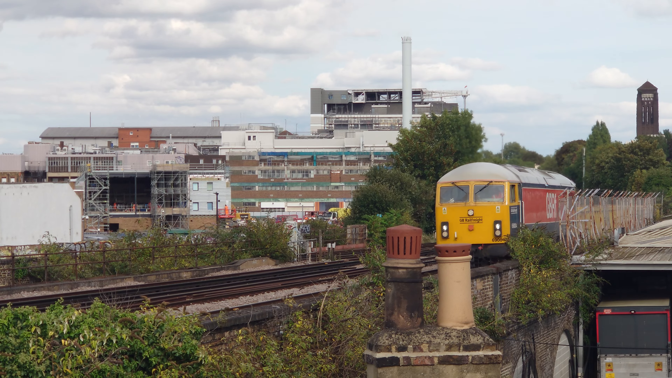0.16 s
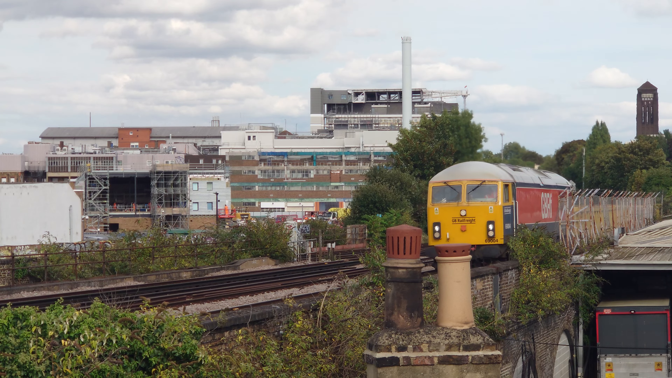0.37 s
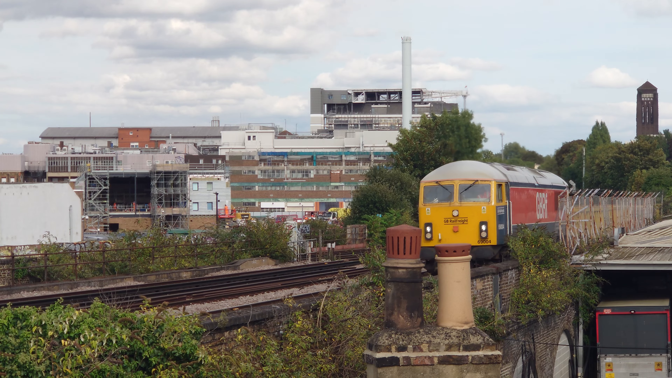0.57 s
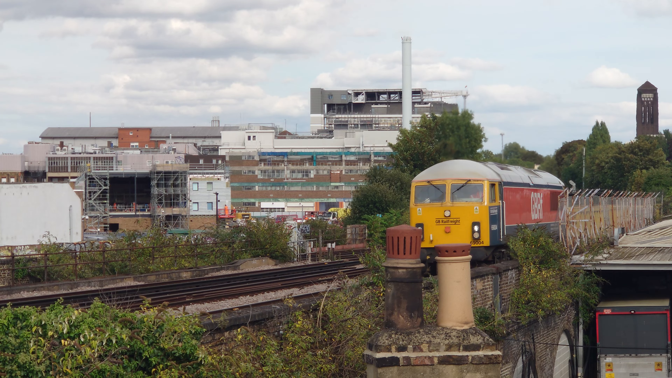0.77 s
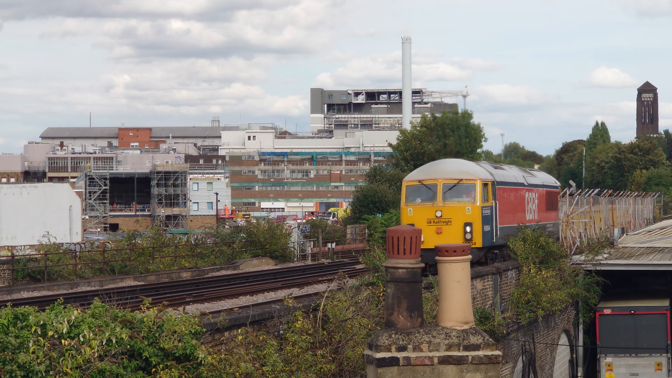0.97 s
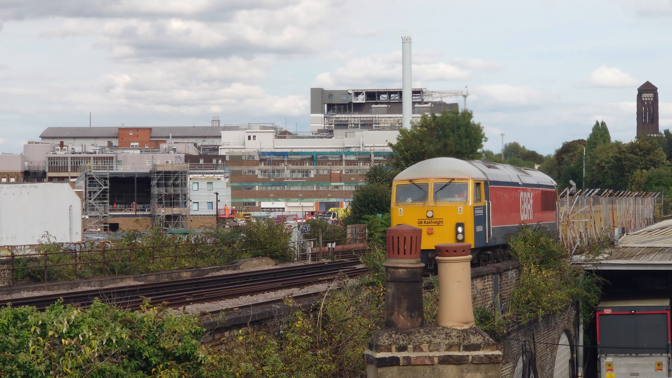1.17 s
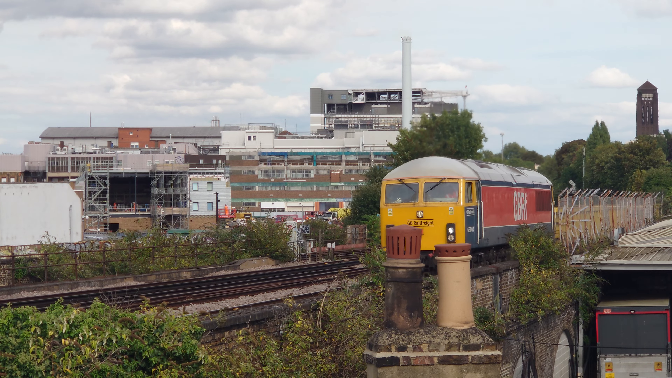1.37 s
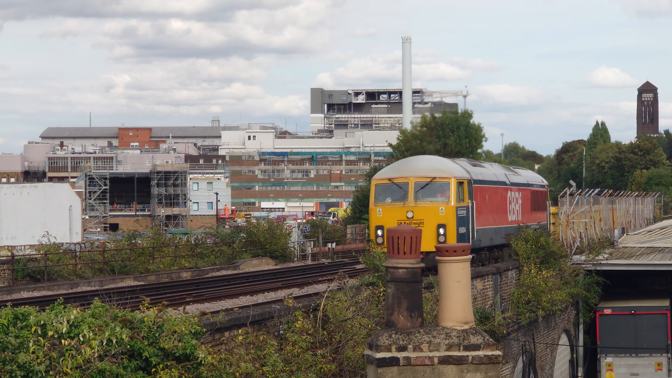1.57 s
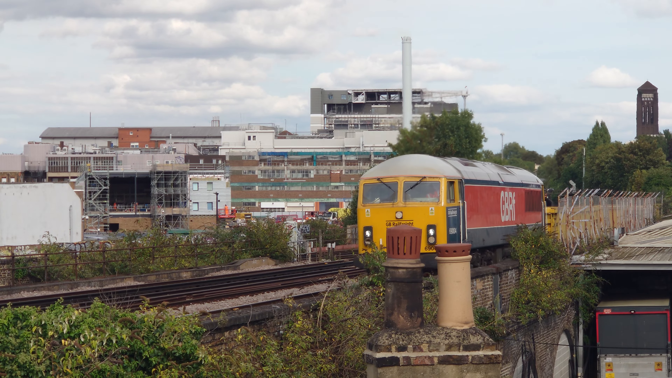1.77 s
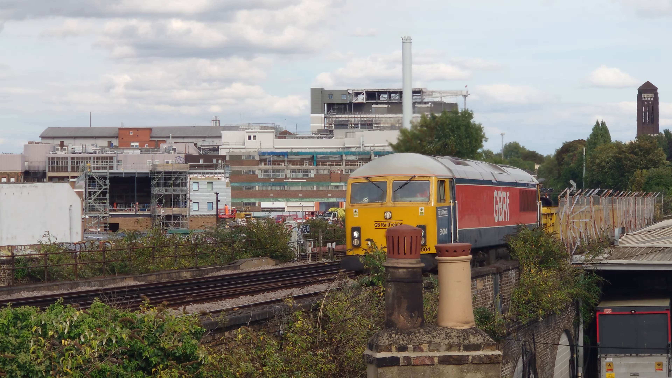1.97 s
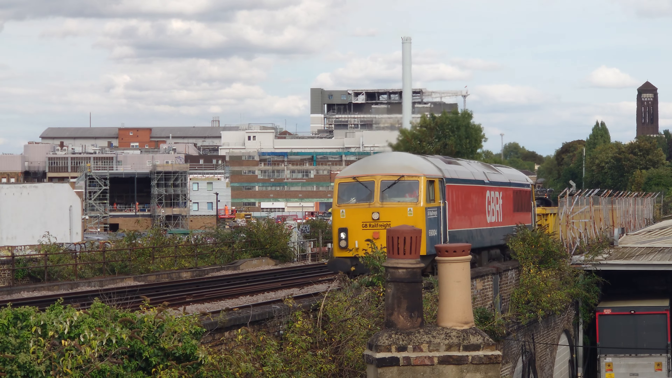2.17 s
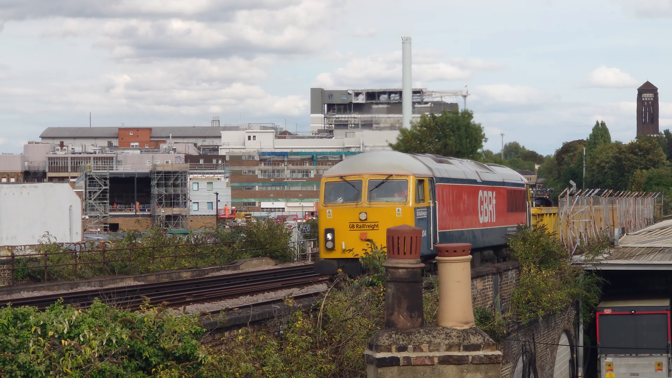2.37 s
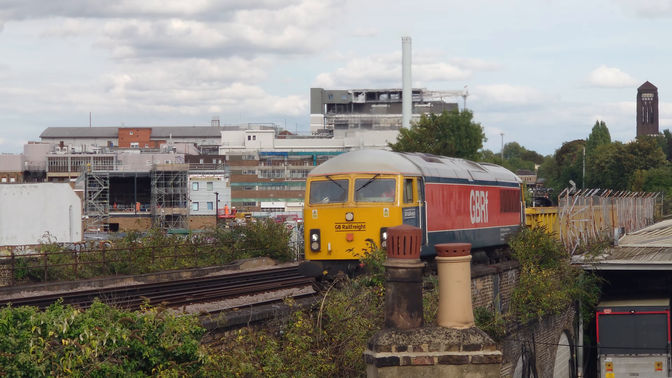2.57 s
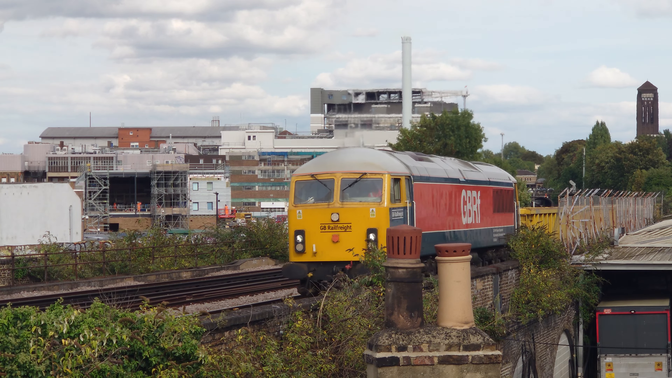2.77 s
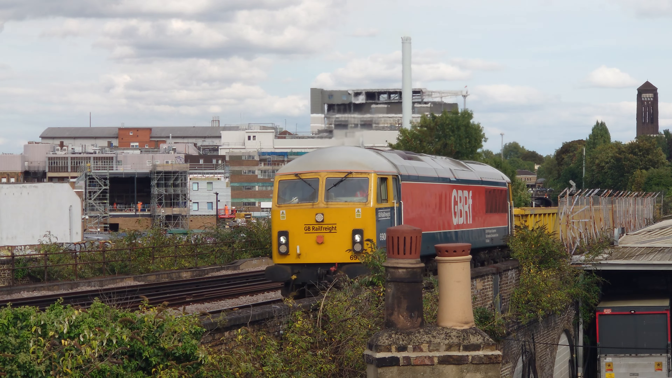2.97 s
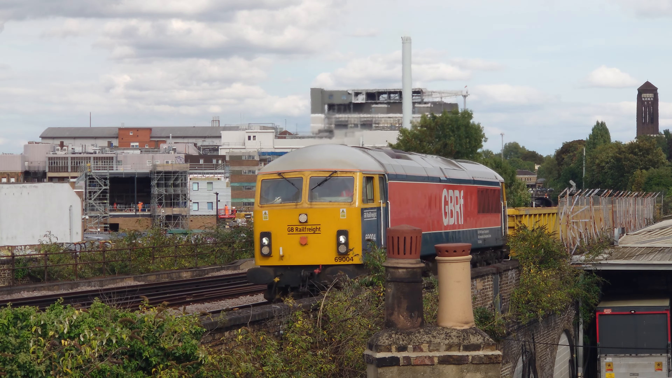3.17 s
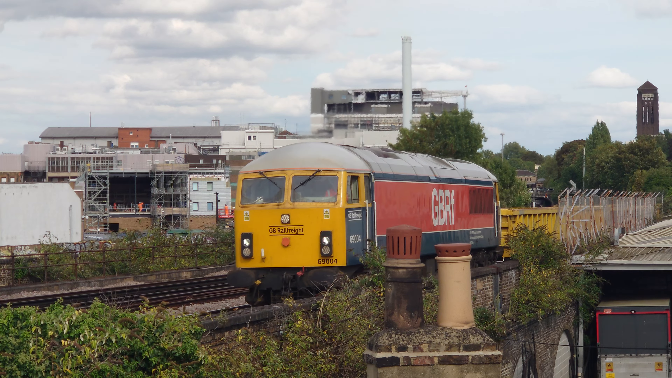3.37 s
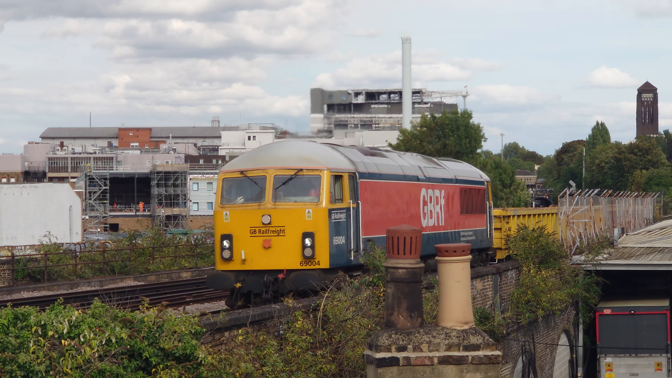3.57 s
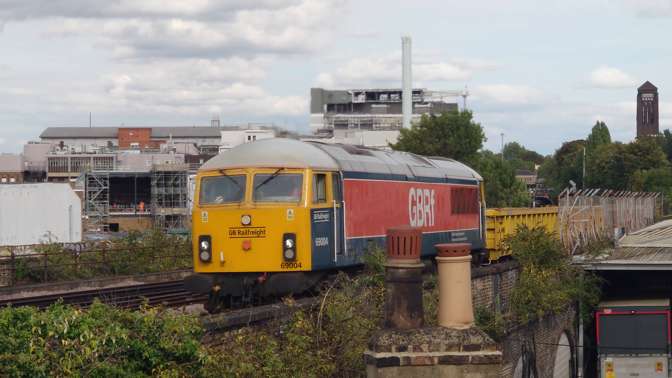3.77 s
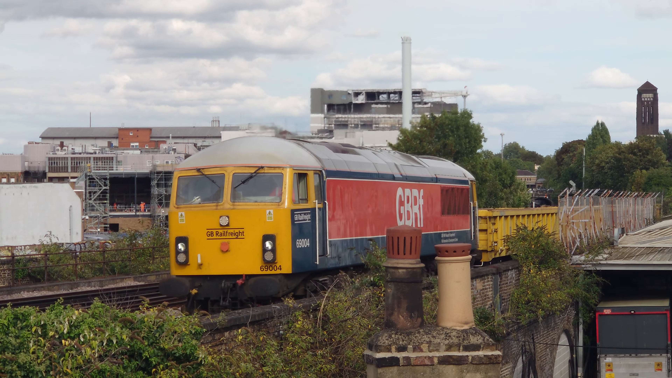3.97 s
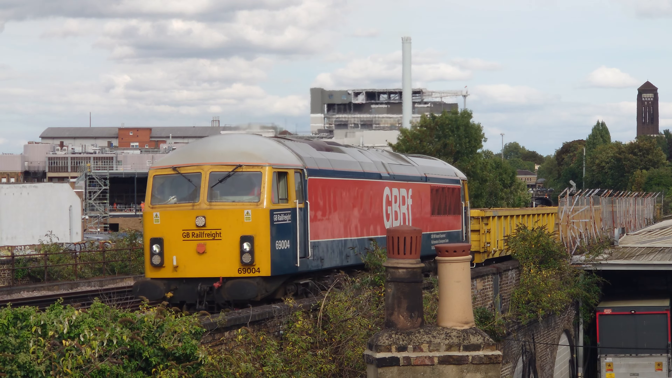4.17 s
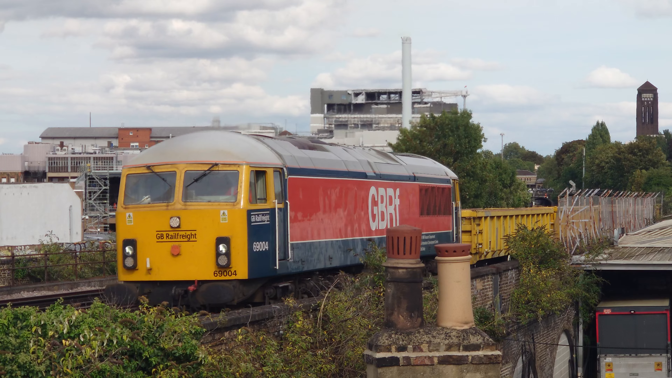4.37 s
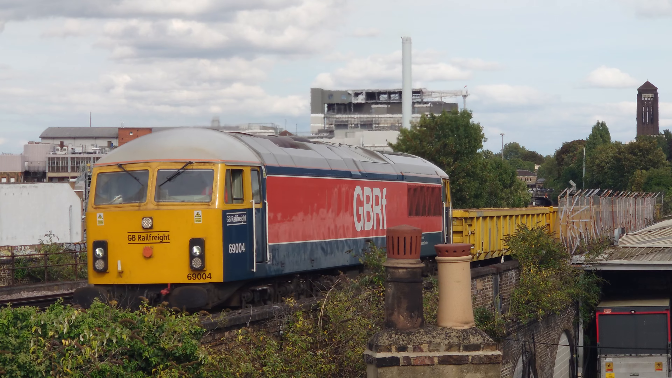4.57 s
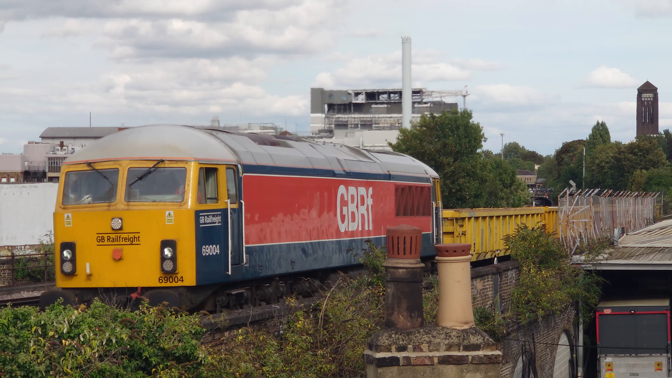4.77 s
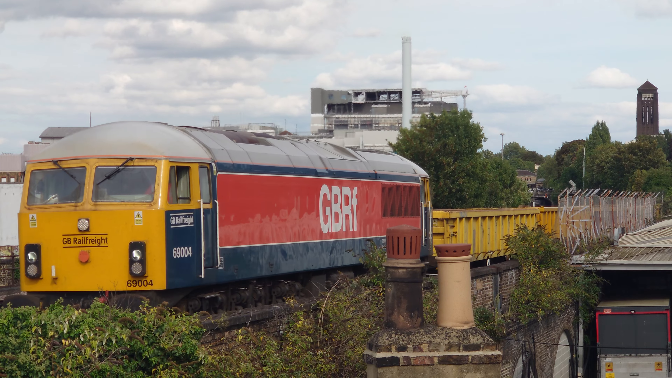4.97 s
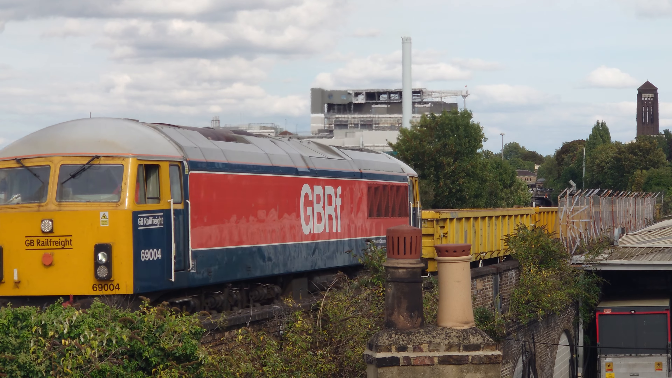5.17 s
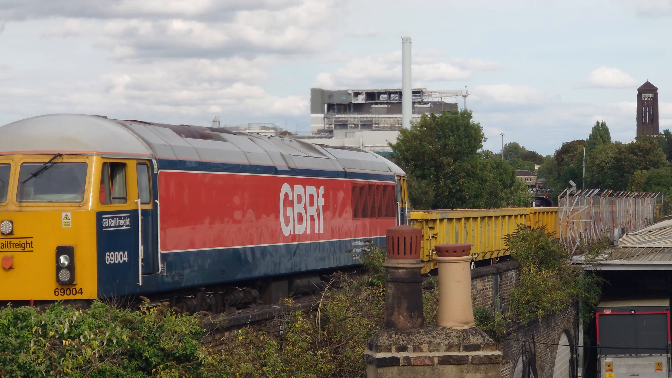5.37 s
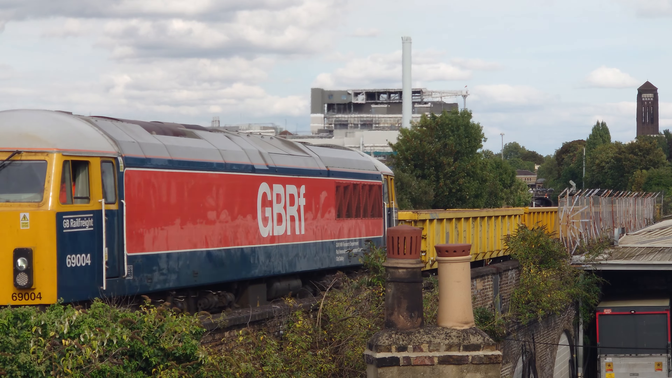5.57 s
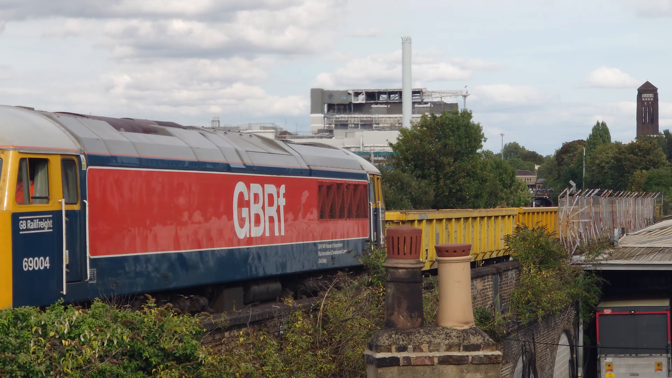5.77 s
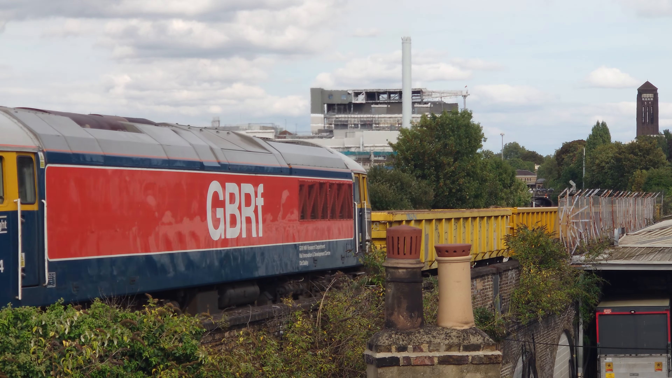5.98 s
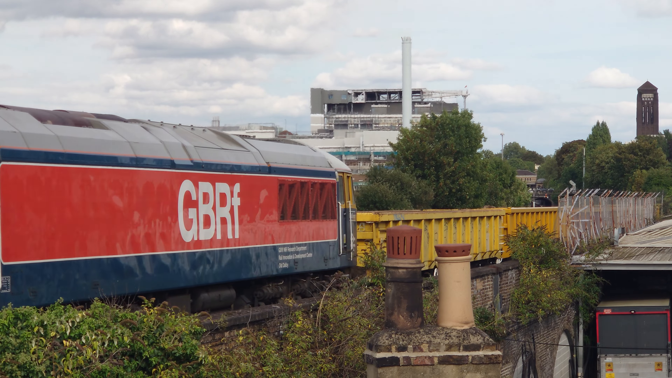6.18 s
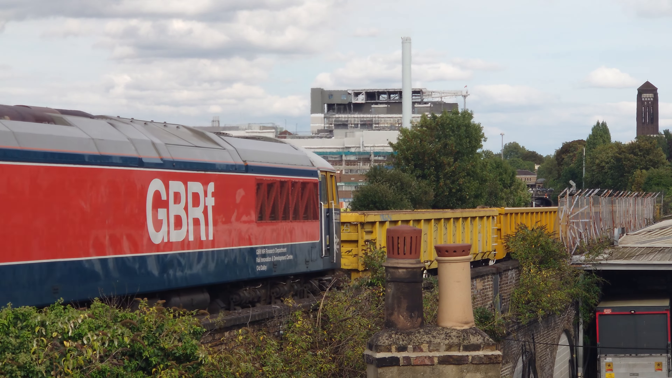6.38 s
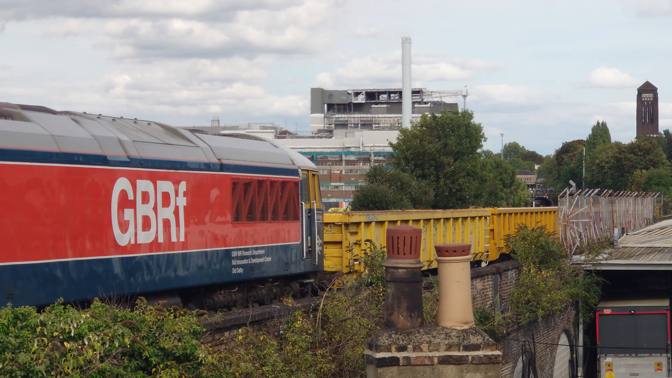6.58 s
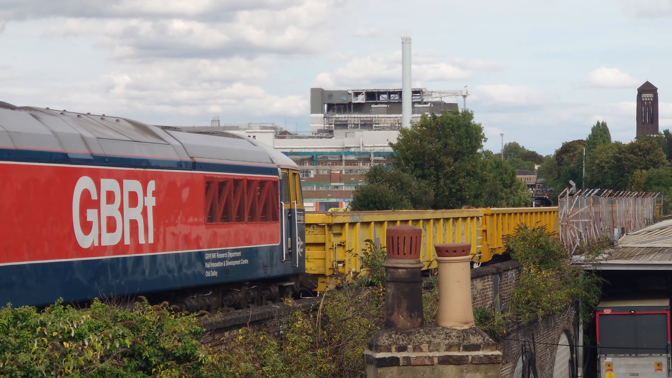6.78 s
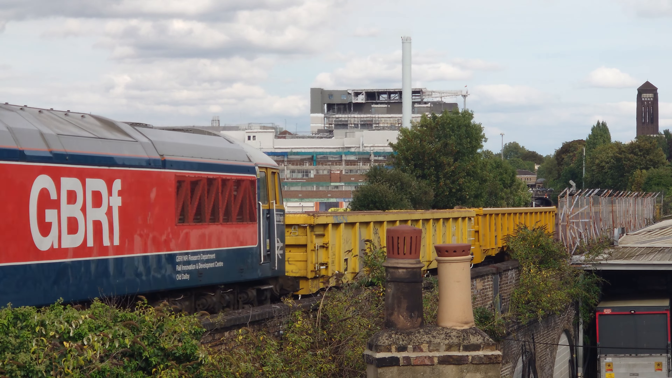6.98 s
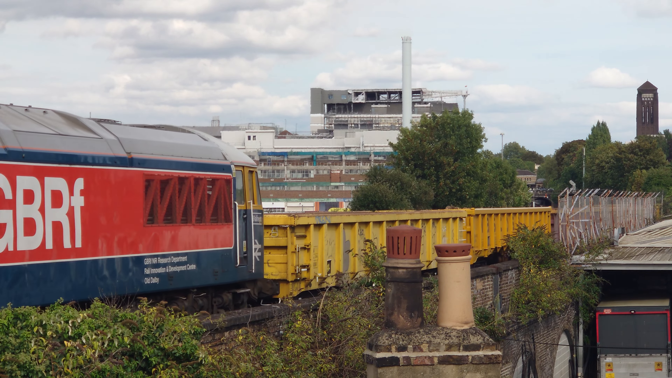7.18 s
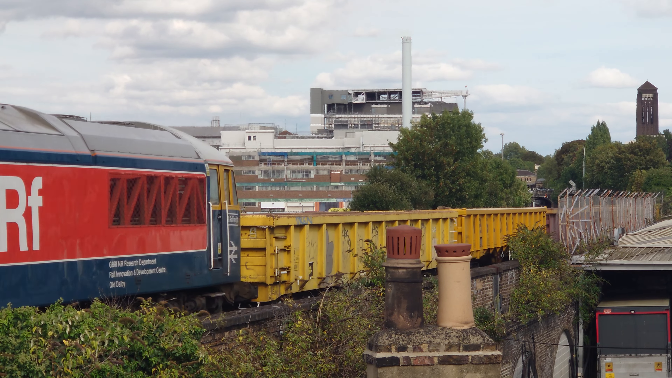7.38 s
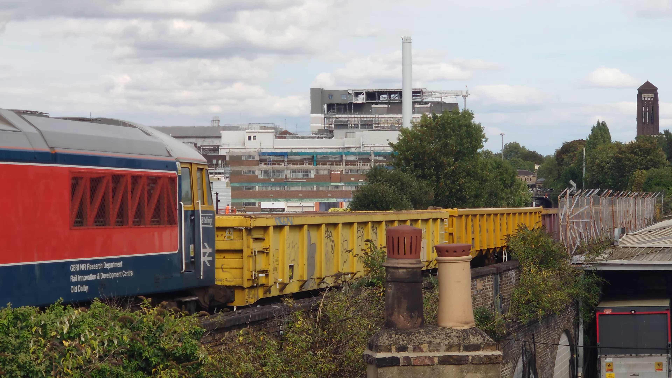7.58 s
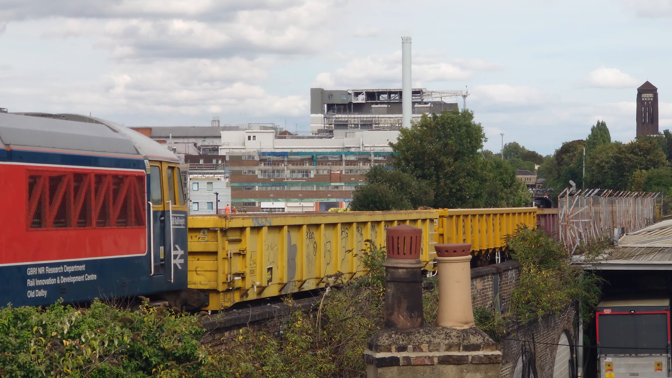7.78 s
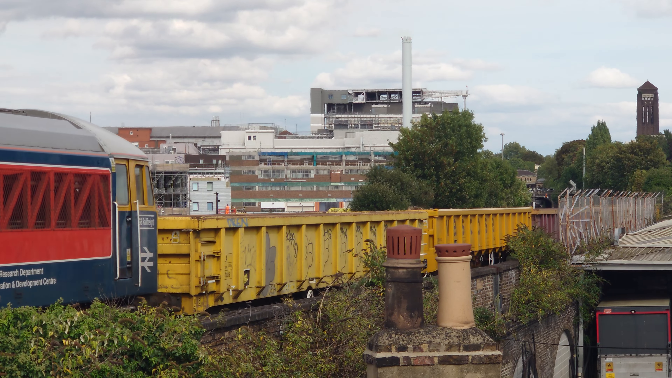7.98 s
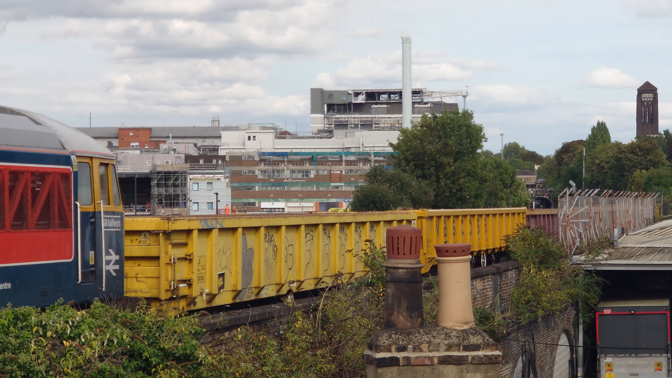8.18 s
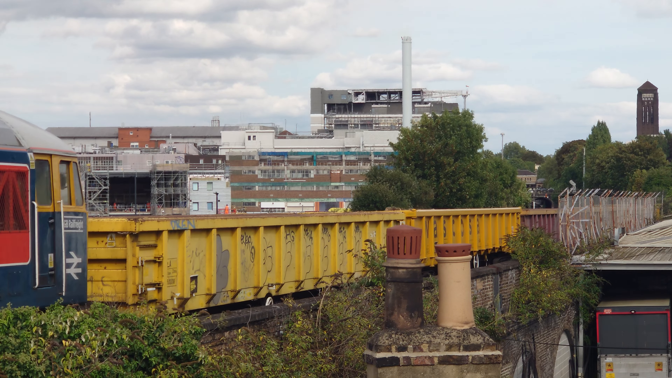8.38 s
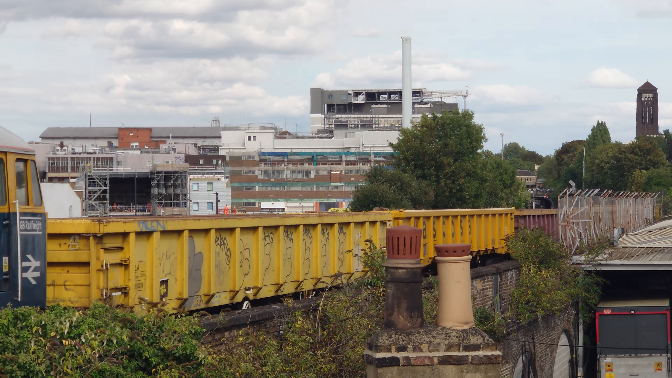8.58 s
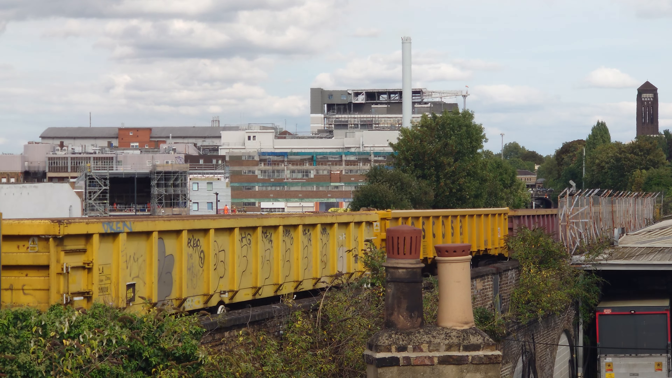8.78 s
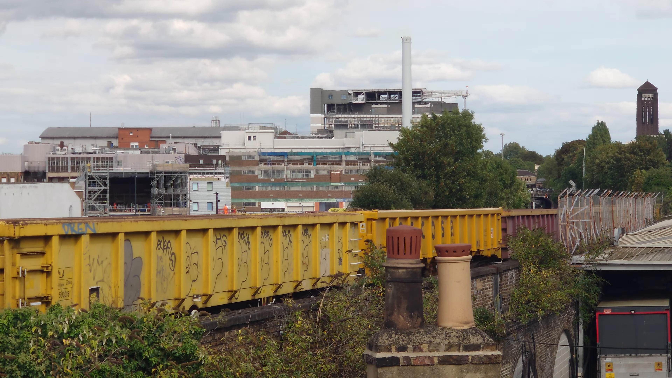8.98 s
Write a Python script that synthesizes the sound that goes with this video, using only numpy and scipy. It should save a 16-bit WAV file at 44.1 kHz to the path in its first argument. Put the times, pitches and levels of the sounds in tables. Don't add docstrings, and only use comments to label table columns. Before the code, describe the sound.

A hard-working two-stroke diesel locomotive approaches along an outdoor viaduct, heard by a fixed stereo microphone. From 0 s a moderately distant, low exhaust drone near 115 Hz throbs quickly and roughly, its strength wavering as walls return slightly flattened echoes. Wheel rumble and casing vibration lie beneath; a thin gear whine around 1.5 kHz and soft fan roar float above, fluctuating. The level climbs gradually through 4 s. At about 5 s a compressed-air valve blows for a quarter second, a soft breathy hiss. From 5 to 7 s the upper sound swings left and the whine surges, strongest around 7 s. Between 7 and 9 s the engine is close and loud, with fuller roar, rattling body noise and a fine high air hiss on the left. Pitch sinks only slightly; it ends still loud, without fading into the distance.

```python
import sys
import numpy as np
from scipy import signal
from scipy.fft import rfft, irfft, next_fast_len
from scipy.io import wavfile
from scipy.ndimage import uniform_filter1d, minimum_filter1d, map_coordinates

SR = 44100
rng = np.random.default_rng(int(sys.argv[2]) if len(sys.argv) > 2 else 0)


def wav_record(signal):
    frames = np.transpose(np.atleast_2d(signal))
    bounded = np.clip(frames, -1, 1)
    quanta = np.round(bounded * 32767).astype(np.int16)
    wavfile.write(sys.argv[1], SR, quanta)


def nominal_scale(level):
    x = np.asarray(level, float) / 20
    return 10 ** x


N = 398223
SECONDS = np.arange(N) / SR
APART = np.array([[1], [-1]])
HALF_APART = APART / 2


def unit(x):
    return x / np.sqrt(np.mean(x ** 2) + 1e-20)


def along(points, hz):
    f, value = np.transpose(points)
    return np.interp(np.log(hz + 1), np.log(f + 1), value)


def curves(rows):
    times, *columns = np.transpose(rows)
    return [np.interp(SECONDS, times, column) for column in columns]


def wobble(rate):
    coarse = np.arange(0, N + 64, 64)
    drift = map_coordinates(rng.standard_normal(200), [coarse * rate / SR], mode="wrap")
    return np.interp(np.arange(N), coarse, drift)


def filtered(x, response, mirror="even"):
    edge = 4096
    x = np.pad(x, [(0, 0), (edge, edge)], mode="reflect", reflect_type=mirror)
    size = next_fast_len(x.shape[1], True)
    spectrum = rfft(x, size) * response(np.fft.rfftfreq(size, 1 / SR))
    return irfft(spectrum, size)[:, edge:N + edge]


# f/Hz, likeness [0-1]
LIKENESS = [(40, .97), (200, .96), (300, .88), (420, .7), (600, .88), (1000, .6), (1500, .48), (3300, .42),
            (5000, .28), (7000, .12)]


def spread(pair, colour):
    def mid_side(hz):
        turn = np.arccos(np.clip(along(LIKENESS, hz), 0, 1)) / 2
        return nominal_scale(along(colour, hz)) * [np.cos(turn), np.sin(turn)]

    mid, side = filtered(pair, mid_side)
    return unit(np.array([mid + side, mid - side]))


def patchy(patch_db, streak_db):
    z = signal.stft(rng.standard_normal((2, N)), nperseg=1024)[2]
    patches = uniform_filter1d(rng.standard_normal(z.shape[1:]), size=10, axis=0)
    patches = uniform_filter1d(patches, size=8, axis=1)
    streaks = uniform_filter1d(rng.standard_normal(z.shape[1:]), size=70, axis=1)
    gain_db = patch_db * unit(patches) + streak_db * unit(streaks)
    return signal.istft(z * nominal_scale(gain_db), nperseg=1024)[1][:, :N]


# t/s, closeness [0-1], left ear lag [samples], air left-right level/dB
PLACE = [
    (0, 0.13, 15.5, 0),
    (2.5, 0.1, 14, 1),
    (4.8, 0.29, 15.5, 2.5),
    (5.2, 0.36, 2.5, 4),
    (6.5, 0.63, -3, 7.5),
    (7.6, 0.79, -5, 17),
    (9.03, 0.99, -6, 19),
]


def closeness():
    return curves(PLACE)[0]


def nearing(pair, far, near):
    close = closeness()
    return (1 - close) * spread(pair, far) + close * spread(pair, near)


def lagged(x):
    moment = np.clip(np.arange(N) - curves(PLACE)[1], 0, N - 1)
    return np.array([map_coordinates(x[0], [moment], mode="mirror"), x[1]])


# t/s, gain over the far start level/dB
APPROACH = [(0, 0), (1, 2.5), (2.2, 4), (3.5, 6.5), (4.5, 8), (5.3, 8), (6, 8.5), (6.5, 8.5), (7.1, 10.5),
            (7.8, 12.5), (8.8, 14.5), (9.03, 14)]
LAWS = {"order 9": (-31, 1.35, -1.5, -0.17), "order 7": (-38.5, 2.5, -25.5, -0.5),
        "order 15": (-43, 0.32, 10, 2), "order 3": (-51, 1.1, 18.5, -0.7),
        "order 79": (-47, 1.0939, -3.5, 1.5), "order 57": (-56.5, 1.81, -4, 1.5),
        "order 73": (-53.5, 1.64, -8, 1), "order 90": (-61, 1.5, 1, 2.5), "mesh": (-57, 1.0436, 4, 0.2),
        "near sidebands": (-54.5, 1.61, -0.5, 3), "far sideband": (-58.5, 1.5, 0, 1.5),
        "octave": (-61.5, 1.26, -4.5, 2.6), "blower": (-62, 1.53, -14, 0.8),
        "rumble": (-35.5, 1.2845, -10, 0.93), "body": (-36.5, 1, -0.18, -0.5),
        "roar": (-46, 0.9477, -0.37, .5), "air": (-83.5, 1.5, 4.5, -1)}
LOW_SWELLS = {"order 9": [(1.96, 0.11, -6.5), (3.18, 0.046, -7), (5.55, 0.11, 5), (8.45, 0.43, -6.5)],
              "order 15": [(.45, 0.094, 10.5), (.9, .15, 10.5), (1.25, 0.065, -15), (1.75, 0.14, 4.5),
              (3.1, .08, -12), (3.85, 0.098, 8), (5.25, 0.11, -13.5), (6.1, .5, -3), (7.3, 0.055, 6.5),
              (8, 0.081, -7), (8.65, .35, 7.5)], "order 3": [(5.4, 0.054, -14.5), (6, .15, 2.5),
              (6.22, .05, -10), (6.45, 0.13, 5), (7.5, .08, -11), (8.45, 0.13, -17.5), (8.72, .12, 1.5),
              (9.03, 0.12, -6)], "rumble": [(3.15, 0.22, 2), (3.6, 0.24, 2.5), (4.12, .2, -4.5),
              (5.0, 0.18, 4.5), (5.55, 0.14, 2.5), (7.3, 0.099, 4), (8.9, .08, -8.5)]}
HIGH_SWELLS = {"order 79": [(4.02, .15, 6), (5.2, 0.17, -10), (7, 0.32, 0.5), (7.85, 0.25, 5.5),
               (8.88, 0.13, -18)], "mesh": [(.1, 0.068, 6), (2.36, .12, -0.5), (4.38, .15, 8.5),
               (6.08, .1, 6), (6.43, 0.08, 9.5), (7.03, 0.18, 15.5), (7.76, 0.18, 9.5), (8.37, 0.032, 6.5),
               (9, .12, -8)], "near sidebands": [(.4, 0.18, 11.5), (2.36, 0.16, 8.5), (4.4, 0.12, 0),
               (5.33, 0.066, 7), (8.4, 0.14, -12)], "far sideband": [(5.7, 0.23, 6), (7, .1, 5),
               (8.45, .15, 3), (9.03, 0.062, 6)], "order 57": [(7.9, 0.34, 4)], "order 73": [(7.9, .15, 6)],
               "octave": [(2.4, .5, 1.5), (3.1, .15, 1.5), (8.55, 0.076, 7), (8.95, 0.13, 11.5)]}
AIR_SWELLS = {"roar": [(2.7, 0.34, 1), (4.8, 0.27, 0.1), (5.9, .3, -1.5)], "air": [(7.6, .25, 3),
              (8.3, .2, 2.5), (9.03, .1, 3.5)], "blower": [(2.85, 0.26, 7.5), (3.7, .25, 6)]}


def level_db(name):
    far_db, growth, near_db, fade_db = LAWS[name]
    t = np.arange(0, N + 64, 64) / SR
    gain_db = np.interp(t, *np.transpose(APPROACH))
    close = np.interp(t, *np.transpose(PLACE)[:2])
    level = far_db + growth * gain_db + near_db * close
    swells = {**LOW_SWELLS, **HIGH_SWELLS, **AIR_SWELLS}
    for s, half, db in swells.get(name, []):
        level = level + db * np.exp(-.5 * ((t - s) / half) ** 2)
    return np.interp(SECONDS, t, level) + fade_db * wobble(3)


# t/s, f/Hz
SHAFT = [
    (0, 12.724),
    (4, 12.721),
    (6, 12.715),
    (7, 12.7),
    (8, 12.677),
    (9.03, 12.65),
]


def crankshaft():
    shaft_hz = curves(SHAFT)[0]
    return shaft_hz, np.cumsum(shaft_hz) / SR


STRONG = [9, 7, 15, 3, 79, 57, 73, 90]
# t/s, extra path [m], echo level/dB
NEAR_WALL = [(0.0, 10.33, -2.24), (0.75, 12.22, -30.4), (1.5, 13.88, -6.76), (2.26, 19.14, -10.66),
             (3.01, 22.16, -0.35), (3.76, 24.96, -8.03), (4.51, 28.74, -8.44), (5.27, 30.24, -15.69),
             (6.02, 37.95, -12.51), (6.77, 39.43, 2.28), (7.52, 42.67, -5.74), (8.28, 45.87, -16.43),
             (9.03, 47.09, 1.31)]
# t/s, extra path [m], echo level/dB
FAR_WALL = [(0.0, 39.05, -11.64), (1.5, 44.4, -8.93), (3.01, 50.99, -4.01), (4.51, 57.19, -17.54),
            (6.02, 62.42, -7.8), (7.52, 68.01, -15.6), (9.03, 72.39, -8.11)]
ECHO_DB = [-1.5, 8.5, -14, -20]
ECHO_PAN_DB = [-1, -0.5]


def exhaust_tones(shaft_hz, turns):
    tones = np.zeros((2, N))
    walls = [curves(NEAR_WALL), curves(FAR_WALL)]
    for n, order in enumerate(STRONG):
        skew = HALF_APART * (wobble(1.298) if order > 20 else 0.3 * wobble(2.6) - 0.32)
        drift = .3 * wobble(1.36) + 0.028 * order * skew + .004 * order * wobble(14)
        phase = 2 * np.pi * (order * turns + rng.random()) + drift
        tone = np.sin(phase)
        if n < len(ECHO_DB):
            for (path, db), pan_db in zip(walls, ECHO_PAN_DB):
                late = 2 * np.pi * order * shaft_hz[0] * path / 343
                tone = tone + nominal_scale(db + ECHO_DB[n] + pan_db * HALF_APART) * np.sin(phase - late)
        tones += nominal_scale(level_db("order " + str(order)) + 2 * skew) * np.sqrt(2) * tone
    return tones


# multiple of the crank, level/dB above the pattern
ORDER_LIFT = [(4, 3), (5, 12), (6, 10.5), (8, -1.5), (10, 11.5), (12, 4.5), (14, 8), (16, 3), (18, 3),
              (24, 11), (30, 10), (34, 3.5), (47, 2), (59, 6.5), (77, 7), (80, 7), (157, 13.5), (158, 13),
              (196, 17)]
# f/Hz, level/dB
FIRING = [(15, -59.5), (45, -4.5), (140, -6.5), (240, -10), (300, -19.5), (440, -18), (480, -23),
          (600, -12), (1020, -18.5), (1250, -39.5), (1450, -29.5), (2100, -33.5), (2700, -48), (3600, -120)]


def firing_pattern(turns, rumble_db, body_db):
    lift = np.ones(513)
    lift[STRONG] = 0
    for order, db in ORDER_LIFT:
        lift[order] = nominal_scale(db)
    fresh = rfft(rng.standard_normal((2, 30, 1024)))
    lasting = np.exp(2j * np.pi * rng.random((2, 1, 513))) * 32
    cycles = irfft(lift * (fresh + 1.6 * lasting))
    where = [SECONDS * 1.6, turns % 1 * 1024]
    pattern = np.array([map_coordinates(c, where, order=1, mode="grid-wrap") for c in cycles])
    level = 0.5 + 0.27 * rumble_db + 0.71 * body_db + 1.6 * closeness()
    return nominal_scale(level) * spread(pattern, FIRING)


# multiple of the crank, layer [index into levels], level/dB
GEAR_PARTS = [(115.7, 1, -4), (116.3, 1, -7), (118.4, 0, -11), (112.2, 2, -5), (113, 2, 0), (114.4, 2, -4),
              (231.6, 3, -8), (232.9, 3, -8), (234.24, 3, -7), (235.6, 3, -8), (156.2, 4, -3), (158, 4, 0),
              (259.5, 4, -9)]


def gears(turns):
    close = closeness()
    names = ("mesh", "near sidebands", "far sideband", "octave", "blower")
    levels = [level_db(name) for name in names]
    mesh_db = levels[0] + 5.5 + 0.89 * APART * wobble(2.2)
    mesh_phase = 2 * np.pi * 117.12 * turns + 0.75 * wobble(11) + 0.42 * APART
    whine = nominal_scale(mesh_db) * np.sin(mesh_phase)
    for multiple, layer, db in GEAR_PARTS:
        fade_db = 1.8 * wobble(3.5) + 3.7 * APART * wobble(2.6)
        part_db = levels[layer] + db + 3 + fade_db - 4.4 * close
        whine += nominal_scale(part_db) * np.sin(2 * np.pi * multiple * turns + wobble(10) + 0.89 * APART)
    return whine


# f/Hz, level/dB per Hz
RUMBLE = [(15, -38), (26, -16), (40, -1.5), (110, -2.5), (150, -11), (230, -7), (300, -36.5), (400, -85.5)]


def wheels(rumble_db):
    return nominal_scale(rumble_db + 1.5 + 5.2 * closeness()) * spread(patchy(0.99, 0.42), RUMBLE)


# f/Hz, level/dB per Hz
BODY_FAR = [(140, -19.5), (240, 0.5), (258, -14), (302, -11), (453, -11), (495, -13), (582, 0.5), (631, -9),
            (990, -9.5), (1070, -23.5), (1400, -22), (1820, -43), (3080, -120)]
# f/Hz, level/dB per Hz
BODY_NEAR = [(140, -32.5), (240, 0), (430, -0.5), (466, -14.5), (640, -9), (715, -4.5), (867, -5),
             (982, -3.5), (1170, -8), (1270, -20.5), (1400, -21.5), (1820, -43.5), (3080, -120)]


def casing(turns, body_db):
    beat = 1 + 0.045 * np.sin(2 * np.pi * turns)
    beat += 0.052 * np.sin(4 * np.pi * turns) + 0.13 * np.sin(12 * np.pi * turns)
    return nominal_scale(body_db + 1) * beat * nearing(patchy(0.89, 0.85), BODY_FAR, BODY_NEAR)


# f/Hz, level/dB per Hz
ROAR_FAR = [(890, -24.5), (1520, -0.5), (1560, -8.5), (1870, -6.5), (2040, -6), (2540, -12), (4340, -16),
            (6490, -30.5), (8000, -55.5), (10400, -82.5), (17600, -120)]
# f/Hz, level/dB per Hz
ROAR_NEAR = [(890, -42.5), (1520, -6.5), (1570, -6.5), (1930, -10.5), (2800, -15.5), (3050, -13),
             (4530, -18), (5270, -23.5), (8000, -43.5), (10400, -78.5), (17600, -120)]


def fan_roar():
    level = level_db("roar") + 4 + 0.12 * wobble(9)
    return lagged(nominal_scale(level) * nearing(patchy(0.45, 2.0), ROAR_FAR, ROAR_NEAR))


# f/Hz, level/dB per Hz
AIR = [(4410, -27.5), (7500, -12.5), (8000, -15), (8750, -2), (10400, -4.5), (12100, 1), (13600, -7.5),
       (15100, -12), (15700, -4.5)]


def leaking_air():
    sides = nominal_scale(curves(PLACE)[2] * HALF_APART)
    sides = sides / np.sqrt(np.mean(sides ** 2, axis=0))
    level = level_db("air") + 4.5 + .8 * wobble(3.9)
    return lagged(nominal_scale(level) * sides * spread(patchy(1.2, 1.2), AIR))


# t/s, length [s], level/dB
PUFF = [
    (5.0, .25, -39),
]
# f/Hz, level/dB per Hz
VALVE = [(1800, -15), (2800, 1.5), (3400, 6), (3900, 0), (4600, -10), (7000, -24), (12000, -45),
         (16000, -59.5)]


def valve():
    gain = 0
    for s, length, db in PUFF:
        opening = (SECONDS - s) / 0.024
        closing = (s + length - SECONDS) / 0.039
        gain = gain + nominal_scale(db) * np.clip(np.minimum(opening, closing), 0, 1)
    return gain * spread(patchy(0.98, 0.77), VALVE)


def scene():
    shaft_hz, turns = crankshaft()
    rumble_db, body_db = level_db("rumble"), level_db("body")
    engine = exhaust_tones(shaft_hz, turns) + firing_pattern(turns, rumble_db, body_db)
    rolling = wheels(rumble_db) + casing(turns, body_db)
    return engine + gears(turns) + rolling + fan_roar() + leaking_air() + valve()


def band_limit(x):
    return signal.sosfilt(signal.butter(12, 16670, fs=SR, output="sos"), x)


# f/Hz, left-right level/dB
PORTS = [(40, -2.2), (110, -1.8), (300, -1), (400, -2), (700, 1.8), (1290, 0), (2380, -4.5), (4400, -4.5),
         (7000, -11), (9000, 0)]


def record(dry):
    def port_response(hz):
        return nominal_scale(along(PORTS, hz) * HALF_APART) * (hz < 15730)

    ports = filtered(dry, port_response, "odd")
    needed = np.minimum(1, .8 / (np.abs(ports).max(axis=0) + 1e-9))
    gain = uniform_filter1d(minimum_filter1d(needed, size=441), size=221)
    from_ends = np.minimum(np.arange(N), np.arange(N)[::-1])
    mix = ports * gain * np.clip(from_ends / 130, 0, 1)
    return band_limit(mix)


dry = scene()
out = record(dry)
wav_record(out)
```